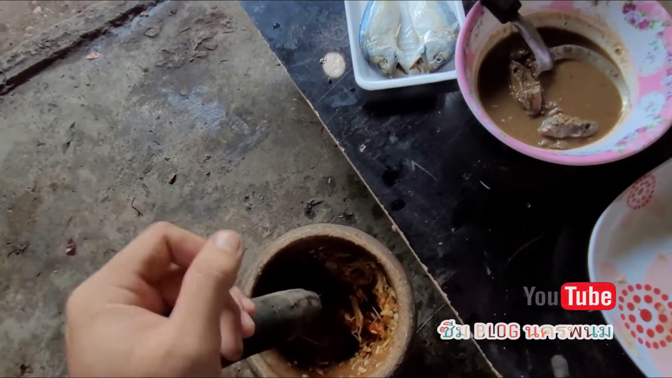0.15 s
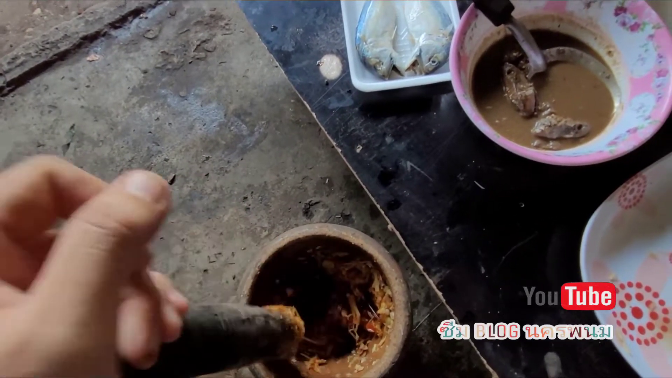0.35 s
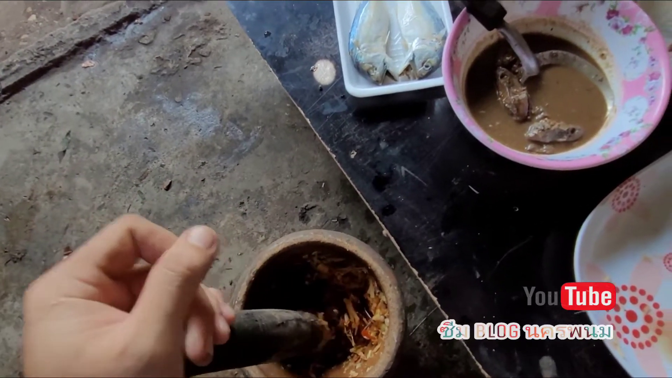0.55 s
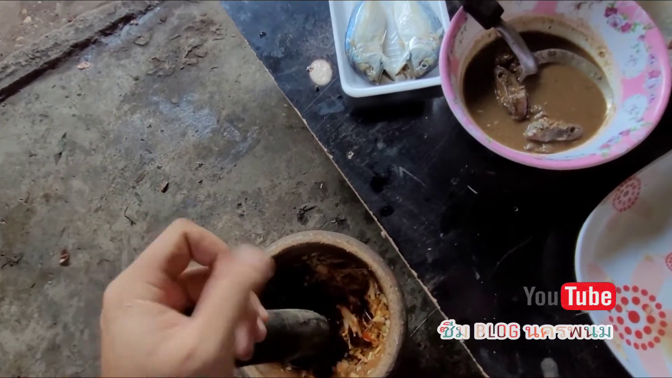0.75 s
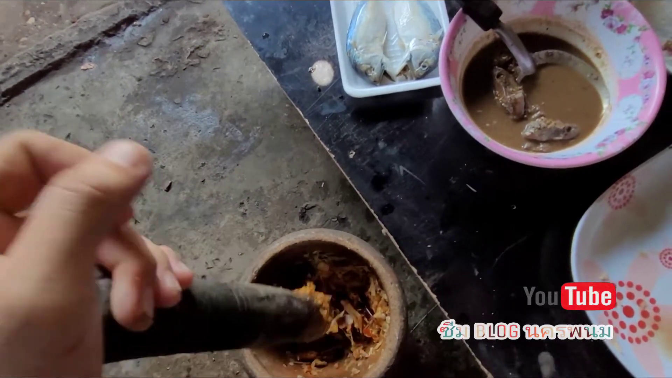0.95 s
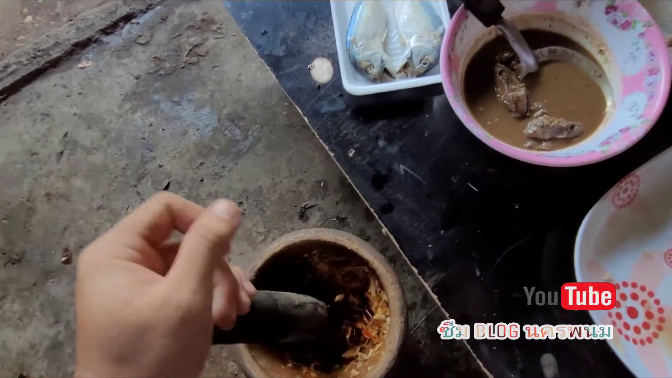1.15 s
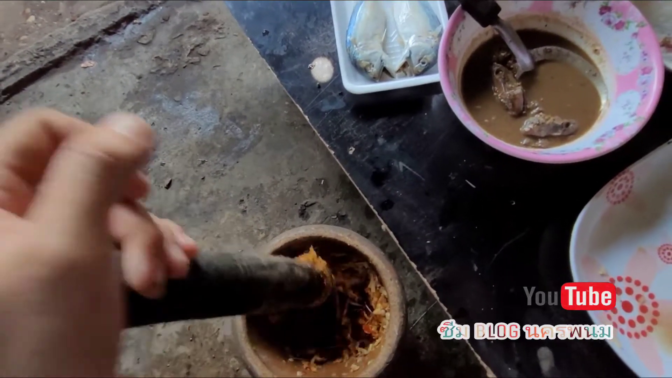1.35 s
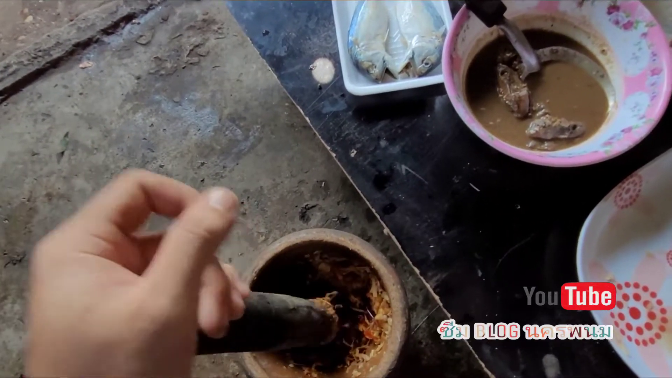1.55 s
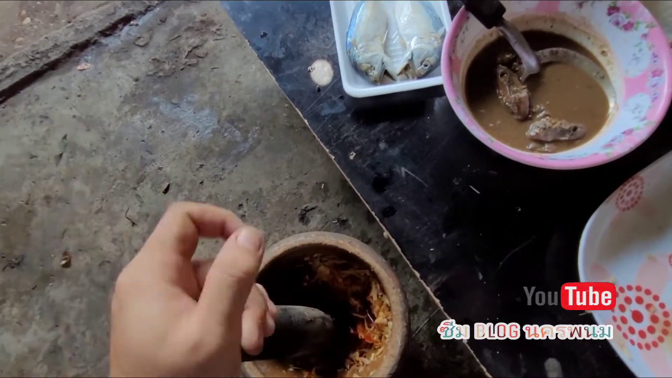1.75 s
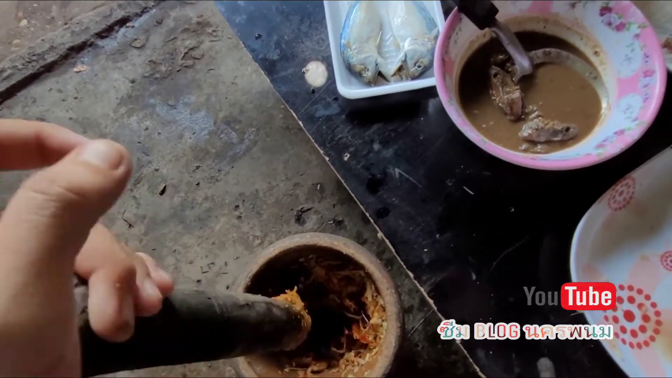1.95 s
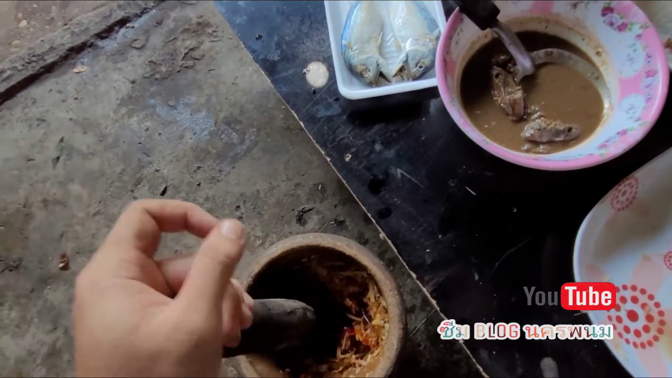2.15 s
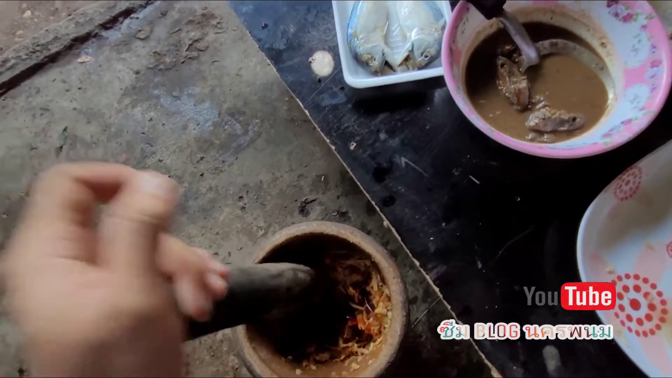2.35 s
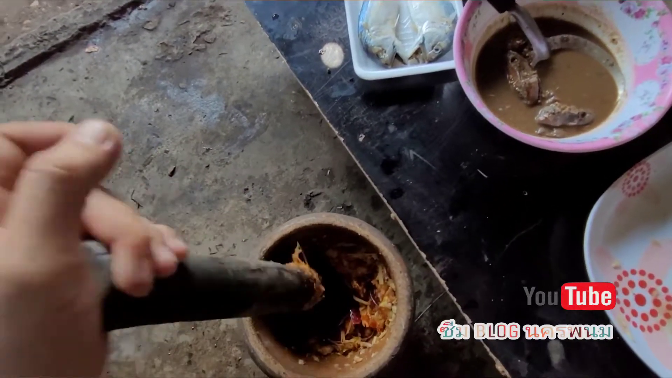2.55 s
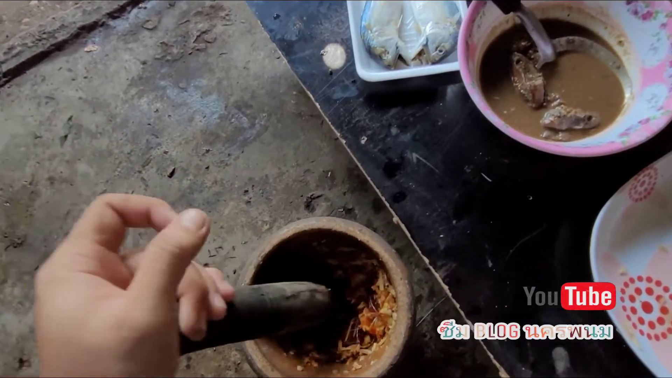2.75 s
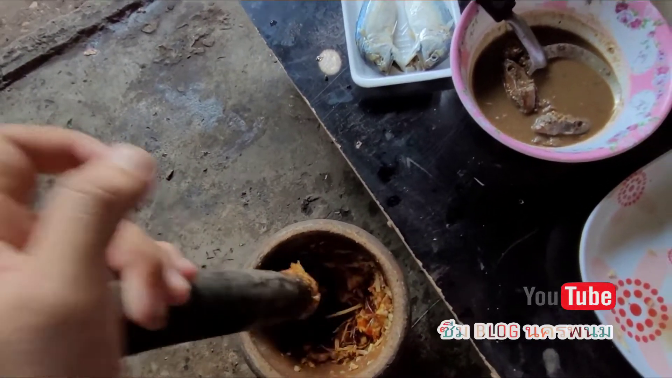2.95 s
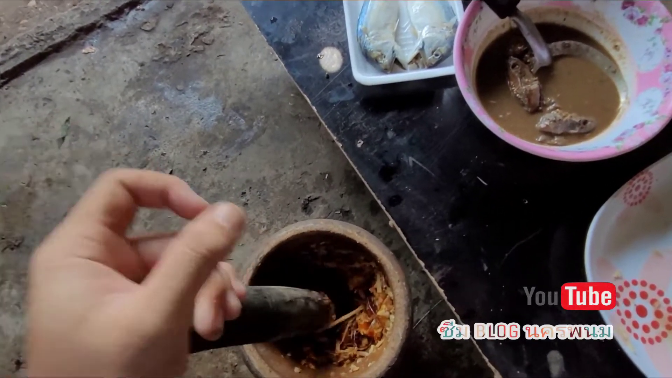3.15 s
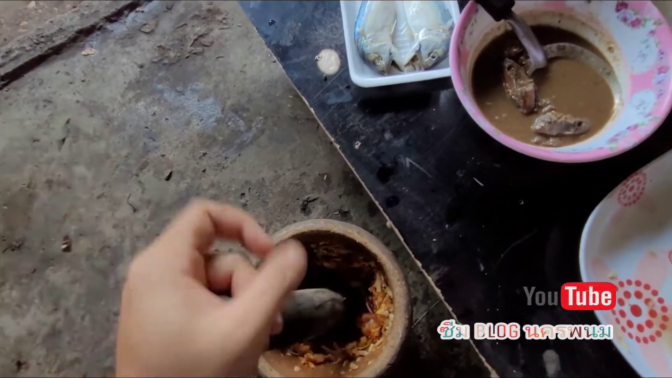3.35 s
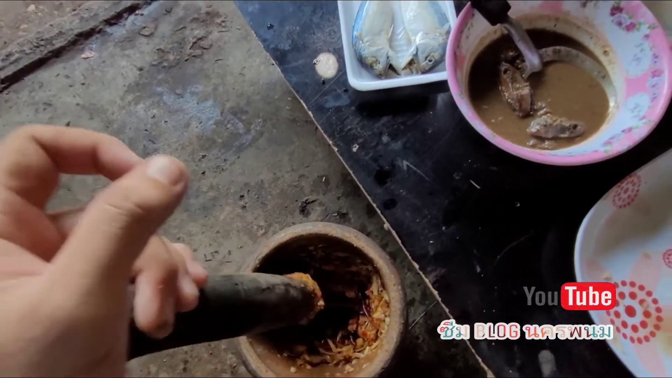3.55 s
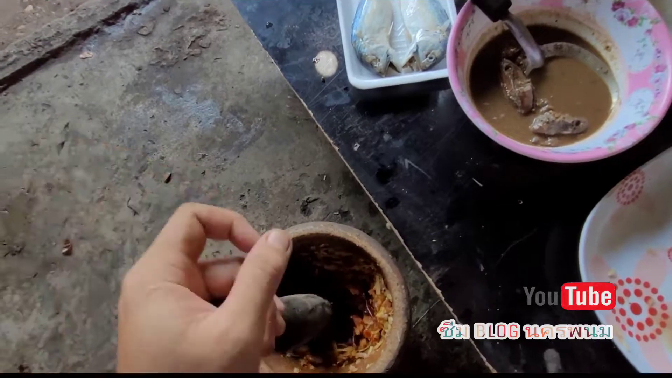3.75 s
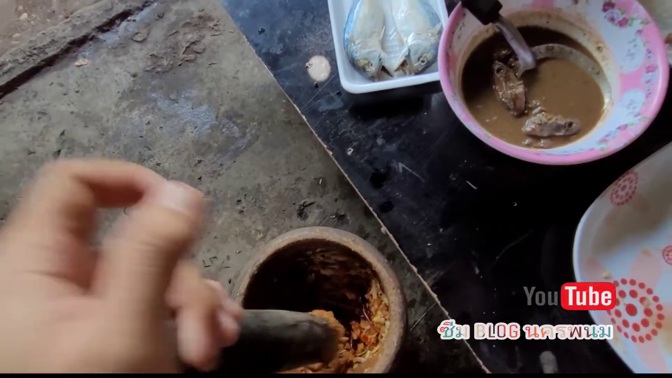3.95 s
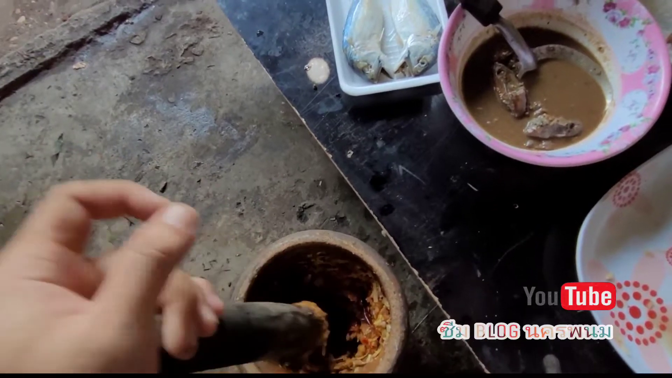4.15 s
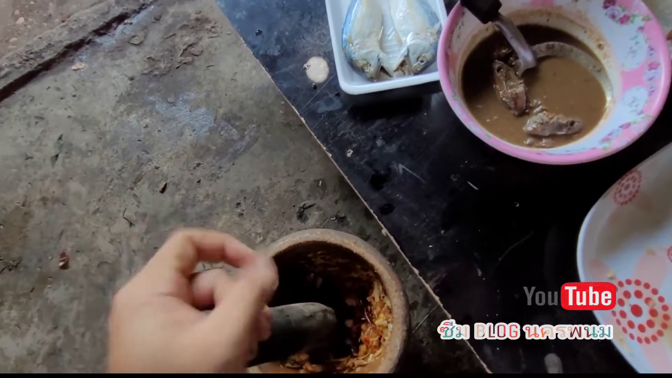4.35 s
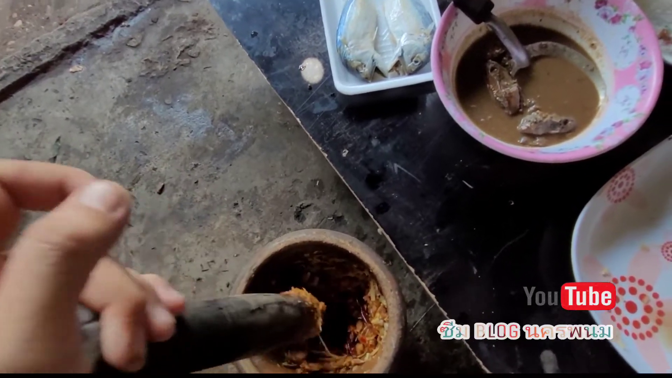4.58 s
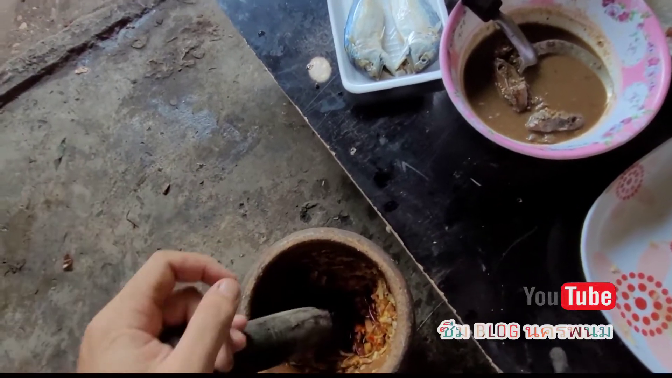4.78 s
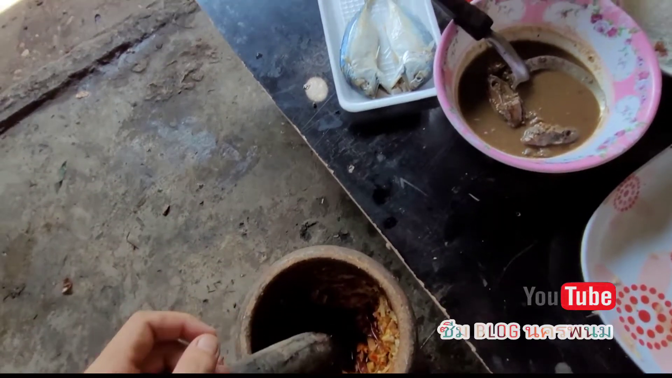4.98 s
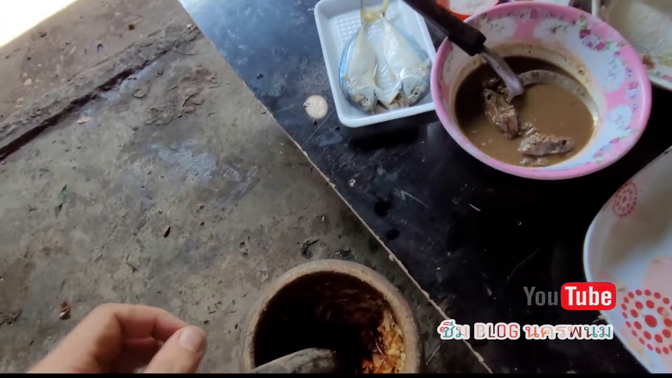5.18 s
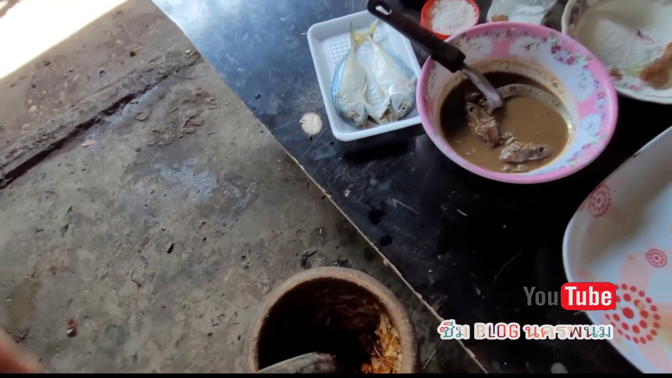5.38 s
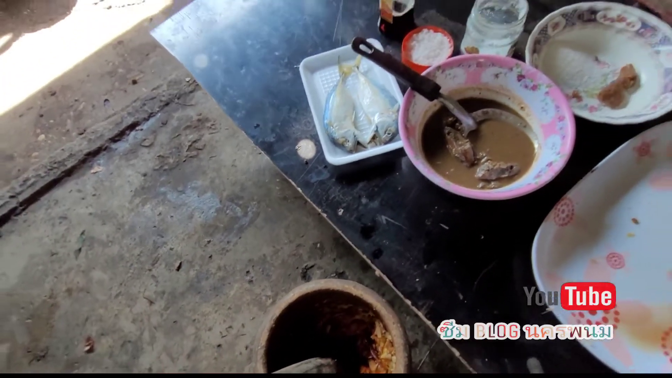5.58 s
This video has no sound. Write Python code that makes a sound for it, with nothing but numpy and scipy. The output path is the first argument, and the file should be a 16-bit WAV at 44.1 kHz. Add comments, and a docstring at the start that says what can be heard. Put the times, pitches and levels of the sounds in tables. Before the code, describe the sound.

Very close to the microphone, a wooden pestle works moist, stringy paste in an earthenware mortar, about three strokes a second. Each is a short wet crunch with a hollow bowl colour and a muffled thud, then a faint sticky smack as it lifts. Harder clay knocks appear at the start and occasionally later. The small kitchen adds a short, dry echo, low rumble and thin hiss; faint birds whistle and chirp far away.

```python
"""In a small kitchen a wooden pestle pounds moist, fibrous paste in an earthenware mortar, close by.
Three strokes a second each crush the paste in dense random snaps, coloured by the bowl's resonances.
Decaying modes make the thuds and knocks on clay; a softer burst of snaps is the smack as the pestle leaves.
Filtered noise gives soft scrapes, the room's rumble, wash and hiss; a low hum wavers beneath.
Far birds are narrow-band tones: warbling whistles and raspy falling chirps."""
import sys
import numpy as np
from scipy import signal
from scipy.fft import rfft, irfft, next_fast_len
from scipy.io import wavfile
from scipy.ndimage import uniform_filter1d

SR = 44100
rng = np.random.default_rng(int(sys.argv[2]) if len(sys.argv) > 2 else 0)


def to_wav(sig):
    """Store sig (one row per channel, or 1-D mono) as 16-bit WAV at the path in sys.argv[1].

    Samples outside -1..1 are clipped; the rate is SR.
    """
    pcm = np.clip(np.atleast_2d(sig), -1, 1) * 32767
    pcm = np.round(pcm).astype(np.int16)
    wavfile.write(sys.argv[1], SR, pcm.T)  # frames by channels


N = 247742


def gain_of(db):
    """Level law: decibels to amplitude."""
    return 10 ** (np.asarray(db) / 20)


def evened(x):
    """Normalisation: scales a signal to rms 1."""
    return x / np.sqrt(np.mean(x ** 2) + 1e-20)


def read(points, hz):
    """Interpolation of a spectrum table along a logarithmic frequency axis."""
    f, value = np.transpose(points)
    return np.interp(np.log(hz + 1), np.log(f + 1), value)


def add(mix, s, sound):
    """Superposition: mixes a sound in from time s."""
    part = mix[max(round(s * SR), 0):][:len(sound)]
    part += sound[:len(part)]


def shaped(x, response):
    """Linear filtering: multiplies the spectrum by a response given as a function of Hz."""
    size = next_fast_len(x.shape[-1] + 4096)
    hz = np.fft.rfftfreq(size, 1 / SR)
    return irfft(rfft(x, size) * response(hz), size)[..., :x.shape[-1]]


def bump(hz, centre, width):
    """Resonance curve of a damped oscillator, with height 1."""
    return 1 / (1 + (2 * (hz - centre) / width) ** 2)


def uneven(depth_db, rate_hz, size=64):
    """Random modulation: a gain wandering mostly below the given rate."""
    t = np.arange(N) / SR
    coarse_t = t[::size]
    count = len(coarse_t)
    hz = np.fft.rfftfreq(count, size / SR)
    slow_spectrum = rfft(rng.standard_normal(count)) / (1 + (hz / rate_hz) ** 4)
    wander = evened(irfft(slow_spectrum, count))
    return np.interp(t, coarse_t, gain_of(depth_db * np.clip(wander, -2, 2)))


# spectrum of the background noise: frequency_hz, relative_density_db (per Hz)
AIR_SPECTRUM = [(20, -13.5), (40, -3), (70, 8), (140, -6), (240, -9.5), (320, -13), (440, -23.5),
                (650, -20), (1000, -25.5), (1900, -28), (2800, -45), (8000, -40), (16000, -44)]
# course of the background: time_s, then relative levels rumble_db, murk_db (low-mid), wash_db, hiss_db
AIR_COURSE = [(0.0, -70, -70, -74, -86), (0.48, -65.5, -76, -81.5, -86), (0.69, -62.5, -66.5, -78.5, -80),
              (1.17, -64, -73, -78, -82.5), (1.38, -59, -67, -74.5, -82.5), (2.02, -55, -69.5, -77, -85.5),
              (2.8, -62.5, -61, -70, -78.5), (3.94, -63.5, -63.5, -73.5, -84), (4.88, -59, -59.5, -67, -83),
              (5.62, -60.5, -61.5, -65.5, -83.5)]
# partials of the low hum: mean_pitch_hz, relative_level_db
HUM_PARTIALS = [(64.6, -63), (129.2, -68)]
RUMBLE_SWAY_DB, RUMBLE_SWAY_HZ = 2.2, 6  # the low background rises and falls


def background(rumble_db=-0.5, murk_db=1, wash_db=-0.5, hiss_db=1.5, hum_db=0,
               waver=0.04, width=.2, wash_width=0.81):
    """Broadband room noise: rumble with a frequency-modulated hum, a wash that dips then grows, thin hiss."""
    t = np.arange(N) / SR
    s, *levels = np.transpose(AIR_COURSE)
    rumble, murk, wash, hiss = (gain_of(np.interp(t, s, db)) for db in levels)

    def band(lo_hz, hi_hz, spread):
        """Band-limited noise: a common signal plus an antiphase side signal that widens it."""
        noise = rng.standard_normal((2, N))
        mid, side = shaped(noise, lambda f: gain_of(read(AIR_SPECTRUM, f)) * (f > lo_hz) * (f < hi_hz))
        return evened(mid) + spread * evened(side) * np.array([[1], [-1]])

    bass_hz, low_hz, high_hz = 105, 480, 2700
    drift = evened(shaped(rng.standard_normal(N), lambda f: 1 / (1 + (f / 4) ** 4)))
    hum = np.zeros(N)
    for hz, db in HUM_PARTIALS:
        phase = 2 * np.pi * np.cumsum(hz * (1 + waver * drift)) / SR
        hum += gain_of(db + hum_db) * np.sqrt(2) * np.sin(phase)
    low = gain_of(rumble_db) * rumble * band(0, bass_hz, width)
    low = low + gain_of(murk_db) * murk * band(bass_hz, low_hz, width)
    low = low + hum * evened(rumble)
    high = gain_of(wash_db) * wash * band(low_hz, 2 * high_hz, wash_width)
    high = high + gain_of(hiss_db) * hiss * band(high_hz, SR, .8)
    lean = gain_of([[1.2], [-1.2]])  # the low part leans left
    return low * uneven(RUMBLE_SWAY_DB, RUMBLE_SWAY_HZ) * lean + high


# pestle knocking on the mortar:
# start_s, relative_level_db, contact_brightness_hz, relative_clay_ringing_db
BARE_KNOCKS = [(.1351, -22, 1510, 12.5), (.182, -24, 780, 9), (.239, -28.5, 495, -19), (.37, -56, 1520, 2),
               (.4975, -31, 550, 6), (.5251, -20.5, 620, -3.5), (2.940, -35, 643, -20),
               (3.5385, -28.5, 645, -30), (4.1641, -18.5, 895, -25)]
# strokes into the paste, levels relative: contact_s, sinking_s, crush_db, fade_s, clap_db, treble_db,
# thud_db, pocket_hz, pocket_lift_db, throat_hz, throat_lift_db (pocket and throat: air resonances)
PESTLE_STROKES = [ (0.178, .047, -36.5, 0.0084, -52.5, -3.5, -42, 1046, 12, 1950, 6.5),
                  (.526, .041, -35, .011, -45, -0.5, -36, 1120, 7.5, 1950, 3.5),
                  (.864, .015, -30, 0.0058, -21, 6, -29, 890, 4.5, 1824, 8),
                  (1.194, .034, -33.5, 0.0067, -22, -0.5, -30, 1020, 3, 1950, 5),
                  (1.531, 0.014, -35, 0.0057, -17, 2.5, -35.5, 690, 8, 2000, 4.5),
                  (1.856, .009, -31.5, 0.012, -37, -0.5, -24.5, 700, 1.5, 2180, 7),
                  (2.169, .028, -29, 0.0068, -41.5, -0.5, -25.5, 740, 10, 1680, 6),
                  (2.477, .036, -30, 0.0084, -49, 0.5, -29, 707, 5, 1680, 5),
                  (2.798, .012, -28, .015, -44, -2, -37, 680, 6.5, 1930, 6),
                  (3.146, .014, -28, .009, -20, -5, -42, 722, -3.5, 2012, 8),
                  (3.453, 0.023, -40.5, 0.034, -33, -7, -34, 687, 0.5, 1750, -1),
                  (3.797, .017, -38, .013, -29, -4.5, -46, 770, 1.5, 1885, -3),
                  (4.121, 0.021, -31.5, .019, -45, 0.5, -56, 640, 3.5, 1650, 0.5),
                  (4.466, .021, -26.5, .008, -27.5, -0.5, -39, 716, 5.5, 1767, 7),
                  (4.792, .016, -29.5, .009, -19.5, -6.5, -34, 850, 3.5, 1852, 6.5)]
# the blow reaches the clay through a cushion of paste
THUD_HZ, THUD_RING_DB, THUD_LAG_S = 406, -29.5, 0.0011
ROCK_S, ROCK_DB = 0.028, -14  # the mortar rocks back on the floor


def blows():
    """Impact excitation: the thud of each stroke, its rocking back, and the bare knocks."""
    for s, sink, _, _, _, _, thud_db, *_ in PESTLE_STROKES:
        yield s + sink + THUD_LAG_S, thud_db, THUD_HZ, THUD_RING_DB
        yield s + sink + ROCK_S, thud_db + ROCK_DB, THUD_HZ, THUD_RING_DB
    yield from BARE_KNOCKS


# modes of the whole mortar, seated on the floor: frequency_hz, relative_level_db, t60_s
BODY_MODES = [(117, -6.5, 0.02), (226, -15.5, 0.28), (325, 2, 0.035), (397, -7, 0.03), (611, -5.5, 0.09),
              (680, 2, 0.024), (850, -17.5, .02)]
# modes of the clay wall: frequency_hz, relative_level_db, t60_s
WALL_MODES = [(1046, -2, 0.039), (1120, -5, 0.098), (1350, -3.5, .035), (1950, -6, 0.016),
              (2880, -18.5, 0.16), (3000, -18.5, 0.098)]


def knocks(level_db=-6, contact_s=0.00066, grit_db=-25, grit_s=0.0038):
    """Modal synthesis: blows ring the mortar; a paste cushion softens contact and mutes the clay wall."""
    t, out = np.arange(SR // 3) / SR, np.zeros(N)
    for s, db, bright_hz, ring_db in blows():
        modes = BODY_MODES + [(hz, mode_db + ring_db, t60) for hz, mode_db, t60 in WALL_MODES]
        ring = np.zeros(len(t))
        for hz, mode_db, t60 in modes:
            decay = gain_of(mode_db - 60 * t / t60)
            softening = np.hypot(1, (hz / bright_hz) ** 2)
            ring += decay * np.sin(2 * np.pi * hz * t) / softening
        # the rough clay rasps on contact
        grit = gain_of(grit_db) * rng.standard_normal(len(t)) * np.exp(-t / grit_s)
        onset = 1 - np.exp(-t / contact_s)
        add(out, s, gain_of(db + level_db) * (ring + grit) * onset)
    return out


def peak(age, swell_s, fade_s, order=3):
    """Transient envelope: a power-law swell to 1 at age 0, then exponential decay."""
    swell = np.clip(1 + age / (order * swell_s), 0, 1) ** order
    return swell * np.exp(-np.maximum(age, 0) / fade_s)


# coarse pieces that burst on their own: start_s, relative_level_db, fade_s, treble_db
COARSE_BURSTS = [(0.534, -44.5, 0.0071, 7), (1.213, -32.5, 0.0058, -8.5), (1.886, -33, 0.012, -1.5),
                 (2.172, -41, 0.0038, 15.5), (2.182, -22.5, 0.0028, 17.5), (2.237, -38, 0.0016, 8),
                 (2.396, -58.5, 0.0028, 27), (2.488, -30.5, 0.0073, 18.5), (2.853, -37, .007, 3),
                 (3.246, -39.5, 0.0016, -6), (3.802, -41.5, .004, 3), (3.854, -39, 0.0074, -8),
                 (3.905, -46, 0.013, -13), (4.087, -51, 0.0024, 9)]
BURST_SWELL_S = 0.0005
# pressure steps up as the pestle bites, then grows with depth by this power
PRESSURE_POWER, BITE_DB = 1.41, -21.5
CLAP_SWELL_S, CLAP_FADE_S = 0.0022, 0.0072  # the last juice is driven out as the pestle bottoms
SETTLE_DB, SETTLE_FADE_S, SETTLE_TREBLE_DB = -46, 0.021, 6  # the crushed paste crackles on softly
# the paste lets go of the rising pestle, in proportion to the stroke
SMACK_S, SMACK_DB, SMACK_TREBLE_DB = .081, -27.5, -11.5
SMACK_SWELL_S, SMACK_FADE_S = .007, 0.012


def squashes(t):
    """Yielding under pressure: strokes crush, clap, settle and let go; pieces burst. Gives treble in dB."""
    for s, sink, crush_db, fade, clap_db, treble_db, *_ in PESTLE_STROKES:
        age = t - s - sink  # time since the pestle bottomed
        depth = np.clip((t - s) / sink, 0, 1)
        pressure = np.maximum(depth ** PRESSURE_POWER, gain_of(BITE_DB) * (t > s))
        crush = pressure * np.exp(-np.maximum(age, 0) / fade)
        yield gain_of(crush_db) * crush, treble_db
        yield gain_of(clap_db) * peak(age, CLAP_SWELL_S, CLAP_FADE_S), treble_db
        yield gain_of(SETTLE_DB) * peak(age, CLAP_SWELL_S, SETTLE_FADE_S), SETTLE_TREBLE_DB
        force = np.hypot(gain_of(crush_db), gain_of(clap_db) / 2)
        smack = peak(age - SMACK_S, SMACK_SWELL_S, SMACK_FADE_S)
        yield force * gain_of(SMACK_DB) * smack, SMACK_TREBLE_DB
    for s, db, fade, treble_db in COARSE_BURSTS:
        yield gain_of(db) * peak(t - s, BURST_SWELL_S, fade), treble_db


SLIP_DB, SLIP_HZ = 2.0, 80  # the pestle sticks and slips on the fibres, so the crunch is uneven


def paste(snaps_per_s=6000, spread_db=6.0, squelch=0.77, treble_hz=2900, apart=0.5, apart_hz=1500, size=12):
    """Granular noise: snapping fibres and squirting juice, louder as the pestle sinks in, then dying away."""
    t = np.arange(N) / SR
    coarse_t = t[::size]
    power = np.zeros((2, len(coarse_t)))
    for pressure, treble_db in squashes(coarse_t):
        tilt = gain_of(treble_db) ** 2  # power ratio of bright to dull
        power += 2 * np.outer([1, tilt], pressure ** 2) / (1 + tilt)
    dull, bright = (np.interp(t, coarse_t, p) for p in power)

    snap_db = spread_db * np.minimum(rng.exponential(1, N), 3)
    sizes = gain_of(snap_db) * (rng.random(N) < snaps_per_s / SR)
    snaps = evened(sizes * rng.choice([-1, 1], (2, N)))
    middle, side = snaps + squelch * rng.standard_normal((2, N))
    # the snaps lie all round the pestle, so their treble differs from port to port
    side_treble = shaped(side, lambda hz: hz ** 2 / (hz ** 2 + apart_hz ** 2))
    grain = middle + np.array([[1], [-1]]) * apart * side_treble
    local_rms = np.sqrt(uniform_filter1d((grain ** 2).mean(0), size=260))
    grain *= uneven(SLIP_DB, SLIP_HZ) / local_rms

    def low(hz):
        """Crossover: the share of each frequency in the dull part."""
        return 1 / (1 + (hz / treble_hz) ** 4)

    return shaped(grain * np.sqrt(dull), low) + shaped(grain * np.sqrt(bright), lambda hz: 1 - low(hz))


def ringing(x, colour_db, size=4096):
    """Minimum-phase filtering: spectral peaks ring on after each click."""
    log_gain = np.log(gain_of(colour_db(abs(np.fft.fftfreq(size, 1 / SR)))))
    taps = np.fft.ifft(np.exp(signal.hilbert(log_gain).conj())).real[:size // 2]
    return signal.oaconvolve(x, taps / np.linalg.norm(taps))[:N]


# spectrum of the paste out of the bowl: frequency_hz, relative_density_db (per Hz)
PASTE_SPECTRUM = [(40, -2), (130, 6), (280, -7), (500, -12), (680, 3), (950, 3.5), (1200, 0.5), (1700, 9.5),
                  (2300, 6), (3500, 2.5), (5800, -5), (9000, -5), (12000, -6.5), (16000, -10.5)]
# air resonances of the bowl: frequency_hz, width_hz, lift_db
BOWL_RESONANCES = [(620, 180, 6), (740, 70, -1), (1650, 120, 0.5), (1950, 57, 2.5), (3080, 420, 1.5),
                   (4110, 250, 4.5), (4930, 330, 4), (6100, 230, 3), (7750, 500, 5.5)]


def bowl_db(hz):
    """Cavity resonance: the colour of the paste, raised or lowered around the bowl's air modes."""
    lift = sum(db * bump(hz, f, width) for f, width, db in BOWL_RESONANCES)
    return read(PASTE_SPECTRUM, hz) + lift


def bowl(crunch, level_db=1.0, pocket_width_hz=300, throat_width_hz=260, bass_width_hz=700,
         first_bass_db=3, last_bass_db=-4):
    """Cavity tuning: pestle and hand shift the air resonances at each stroke; the bass thins with time."""
    out = np.zeros((2, N))
    ends = [row[0] for row in PESTLE_STROKES[1:]] + [N / SR]
    basses = np.linspace(first_bass_db, last_bass_db, len(PESTLE_STROKES))
    for stroke, end, bass_db in zip(PESTLE_STROKES, ends, basses):
        s, *_, pocket_hz, pocket_db, throat_hz, throat_db = stroke

        def colour(hz):
            """Sum of resonance lifts in dB for this stroke."""
            return (bowl_db(hz) + pocket_db * bump(hz, pocket_hz, pocket_width_hz)
                    + throat_db * bump(hz, throat_hz, throat_width_hz) + bass_db * bump(hz, 0, bass_width_hz))

        for side, sound in zip(out, crunch[:, round(s * SR):round(end * SR)]):
            add(side, s, ringing(sound, colour))
    return gain_of(level_db) * out


# the pestle scraping softly up the wall as it is drawn out:
# centre_s, relative_level_db, length_s (four standard deviations of the swell)
WALL_SCRAPES = [(0.715, -60.5, 0.068), (2.563, -51, .05), (2.677, -56, 0.059), (3.609, -56, .06)]
SCRAPE_WIDTH_HZ = 130


def scrapes(size=8192):
    """Friction excitation: rubbing stirs the mortar's low modes without striking them."""
    def low_modes(f):
        """Sum of broad resonances at the mortar's modes."""
        return sum(gain_of(db) * bump(f, hz, SCRAPE_WIDTH_HZ) for hz, db, _ in BODY_MODES)

    out = np.zeros(N)
    for s, db, length in WALL_SCRAPES:
        rub = evened(shaped(rng.standard_normal(size), low_modes))
        swell = signal.windows.gaussian(size, length * SR / 4)
        add(out, s - size / SR / 2, gain_of(db) * rub * swell)
    return out


def radiated(x, corner_hz=140):
    """Radiation efficiency: a small mortar radiates little bass."""
    return signal.sosfilt(signal.butter(2, corner_hz, "high", fs=SR, output="sos"), x)


FLUTTER_DB, FLUTTER_HZ = 2, 45  # every call flutters in level


def call(hz, width_hz, taper):
    """Narrow-band modulation: a tone along the pitch curve hz, blurred by distance."""
    noise = rng.standard_normal((2, SR))
    a, b = shaped(noise, lambda f: bump(f, 0, 2.5 * width_hz) ** 2)[:, :len(hz)]
    carrier = np.exp(2j * np.pi * np.cumsum(hz) / SR)
    tone = evened(((a + 1j * b) * carrier).real)
    flutter = uneven(FLUTTER_DB, FLUTTER_HZ)[:len(hz)]
    return flutter * signal.windows.tukey(len(hz), taper) * tone


# thin wavering whistles, as of a far bird: start_s, length_s, mean_pitch_hz, relative_level_db
BIRD_WHISTLES = [(1.032, 0.26, 4560, -76.5), (1.3, 0.38, 4540, -73.5), (1.677, 0.23, 4550, -77.5),
                 (3.31, 0.083, 4440, -87), (4.392, 0.22, 3480, -73)]
WARBLE_PER_S, WARBLE_DEPTH, WHISTLE_WIDTH_HZ = 7, 0.03, 180
# raspy falling chirps: start_s, relative_level_db
BIRD_CHIRPS = [(1.396, -62.5), (4.893, -59), (5.02, -60.5), (5.42, -77)]
# bands of a chirp: starting_pitch_hz, width_hz, relative_level_db
RASP_BANDS = [(3800, 750, -5), (5300, 1700, -7.5)]
CHIRP_S, CHIRP_FALL = 0.12, 0.2  # the fall is a fraction of the starting pitch


def birds(whistle_db=-1, chirp_db=2.0):
    """Frequency modulation: far birds give warbling whistles and short falling rasps."""
    out = np.zeros((2, N))
    for side in out:
        for s, length, hz, db in BIRD_WHISTLES:
            t = np.arange(0, length, 1 / SR)
            warble = 1 - WARBLE_DEPTH * np.cos(2 * np.pi * WARBLE_PER_S * t)
            add(side, s, gain_of(db + whistle_db) * call(hz * warble, WHISTLE_WIDTH_HZ, taper=0.53))
        fall = np.linspace(1, 1 - CHIRP_FALL, int(CHIRP_S * SR))
        for s, db in BIRD_CHIRPS:
            for hz, width_hz, band_db in RASP_BANDS:
                add(side, s, gain_of(db + band_db + chirp_db) * call(hz * fall, width_hz, taper=1.0))
    return out


# level difference of the two microphone ports: frequency_hz, left_minus_right_db (before skew)
PORT_LEVELS = [(100, 2), (400, 2.5), (620, 4.5), (760, -4), (1000, -0.5), (1350, -2), (1700, -9.5),
               (2050, -7.5), (2800, 1), (4200, 1), (5000, 1.5), (7700, -2.5), (11000, 3.5), (15000, 5.5)]
# phase difference of the two ports: frequency_hz, left_lead_rad
PORT_PHASES = [(100, 0.36), (680, 0.35), (900, 1), (1400, 0.73), (2000, 0.63), (3000, 2.56), (5000, 1.5),
               (7500, 1.6), (15000, 1.2)]


def ports(x, skew=0.98):
    """Interchannel difference: the near mortar reaches two microphone ports in unlike colour and phase."""
    def response(hz):
        """Complex gain of each port, with mean power kept at 1."""
        pair = gain_of(np.outer([.5, -.5], skew * read(PORT_LEVELS, hz)))
        phase = np.outer([.5, -.5], read(PORT_PHASES, hz))
        return pair / np.sqrt((pair ** 2).mean(0)) * np.exp(1j * phase)
    return shaped(x, response)


# decay of the kitchen: frequency_hz, t60_s
KITCHEN_DECAY = [(100, 0.19), (500, 0.22), (2000, 0.17), (6000, 0.2), (15000, 0.13)]


def kitchen(x, wet_db=-14, early_db=-12, early_s=0.0011, gap_s=0.0075, mono_hz=700):
    """Reverberation: quick scatter off floor and dishes, then a short tail whose bass is alike in both sides."""
    t = np.arange(SR // 2) / SR
    taps = rng.standard_normal((2, len(t))) * (rng.random((2, len(t))) < .2)  # sparse random echoes
    hz, age, z = signal.stft(taps, SR, nperseg=256)
    same = (1 / (1 + (hz / mono_hz) ** 2))[:, None]
    z[1] = same * z[0] + np.sqrt(1 - same ** 2) * z[1]
    decay = gain_of(-60 * age / read(KITCHEN_DECAY, hz)[:, None])
    tail = signal.istft(z * decay, SR, nperseg=256)[1][:, :len(t)]
    tail *= 1 - np.exp(-(t / gap_s) ** 2)
    # reversing the taps in time gives the early scatter its own pattern
    early = shaped(taps[:, ::-1] * np.exp(-t / early_s), lambda f: f ** 2 / (f ** 2 + 1500 ** 2))
    room = np.zeros((2, len(t)))
    for db, echoes in [(wet_db, tail), (early_db, early)]:
        room += gain_of(db) * echoes / np.linalg.norm(echoes, axis=1, keepdims=True)
    return x + signal.fftconvolve(x, room, axes=1)[:, :N]


# the level dips briefly: centre_s, half_length_s, level_db
LEVEL_DIP = (3.844, 0.0061, -18)


def scene(count=3):
    """Superposition: successive strokes take turns through a few random echo patterns of the room."""
    t = np.arange(N) / SR
    mortar = ports(bowl(paste())) + ports(radiated(knocks() + scrapes()), skew=1.0)
    stroke = np.searchsorted([row[0] for row in PESTLE_STROKES], t)
    heard = sum(kitchen(mortar * (stroke % count == k)) for k in range(count))
    s, half_length, db = LEVEL_DIP
    dip = gain_of(db * np.exp(-((t - s) / half_length) ** 4))
    return (heard + background() + birds()) * dip


def record(dry):
    """Band limitation: a linear-phase low-pass at 16.1 kHz ends the recorder's range."""
    taps = signal.firwin(511, 16100, window=("kaiser", 9), fs=SR)
    return signal.oaconvolve(dry, taps[None], "same")


dry = scene()
out = record(dry)
to_wav(out)
```